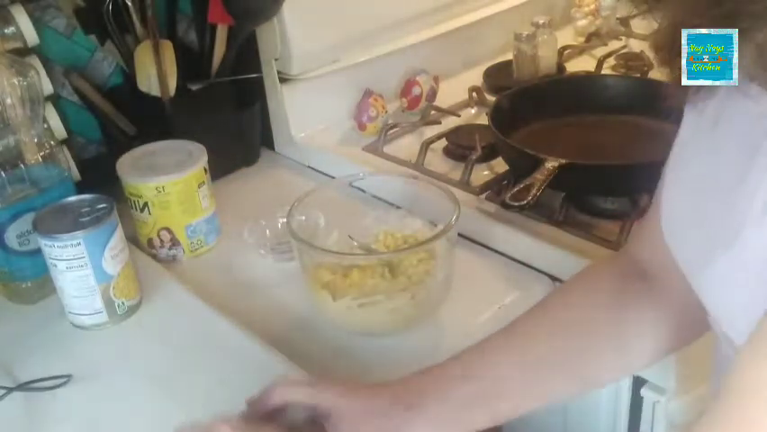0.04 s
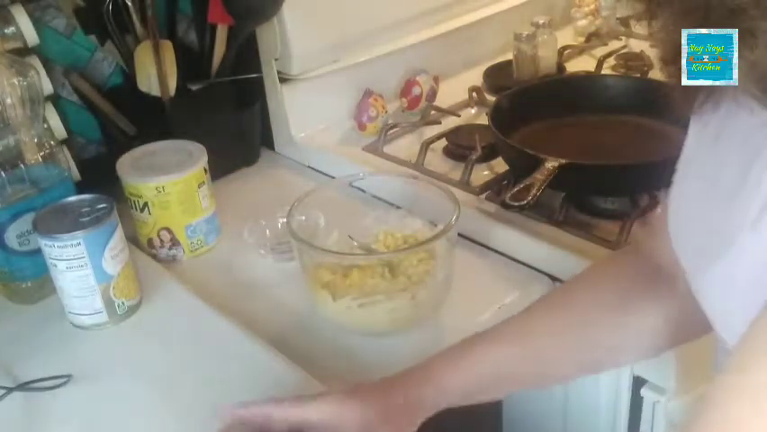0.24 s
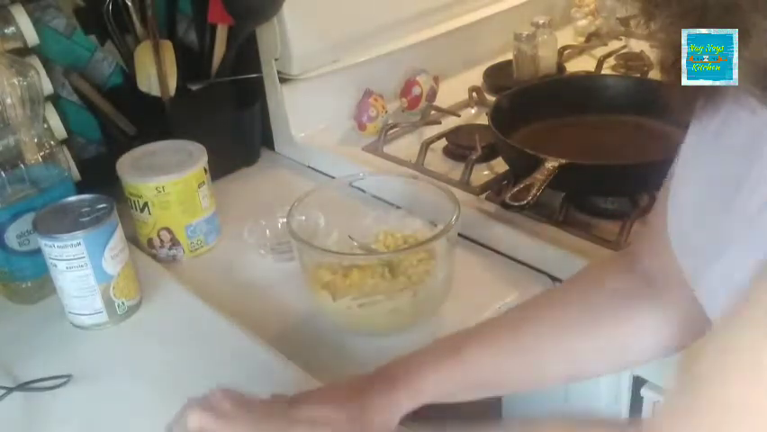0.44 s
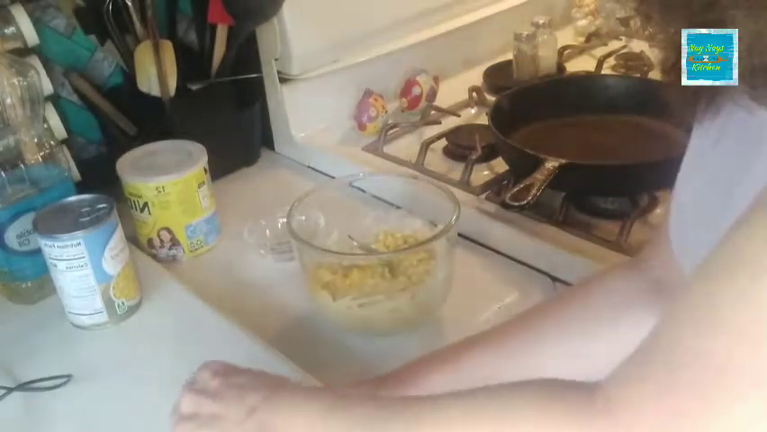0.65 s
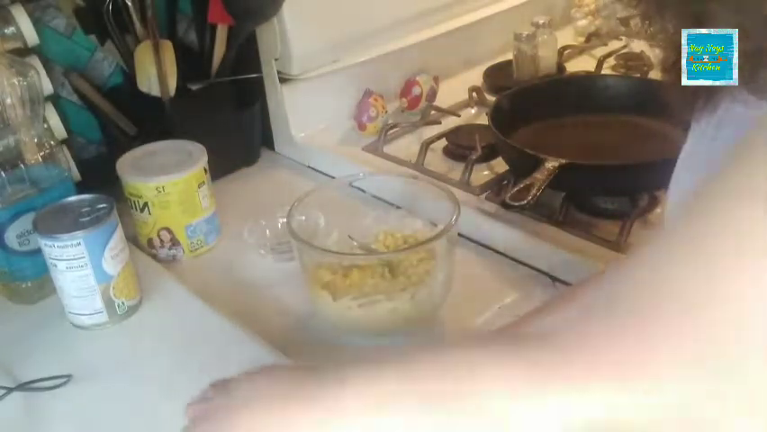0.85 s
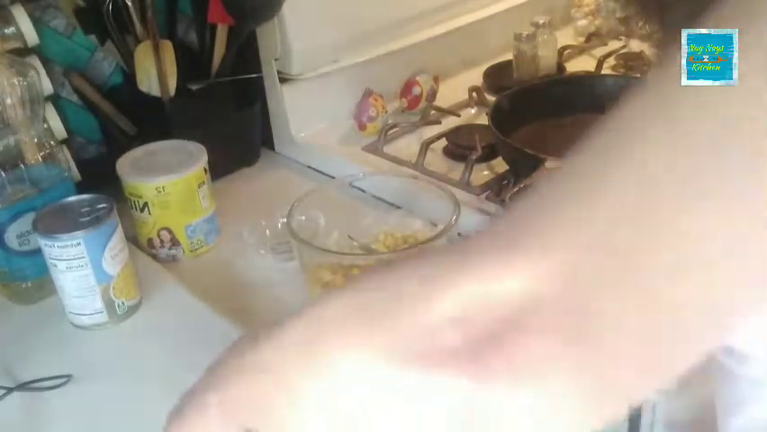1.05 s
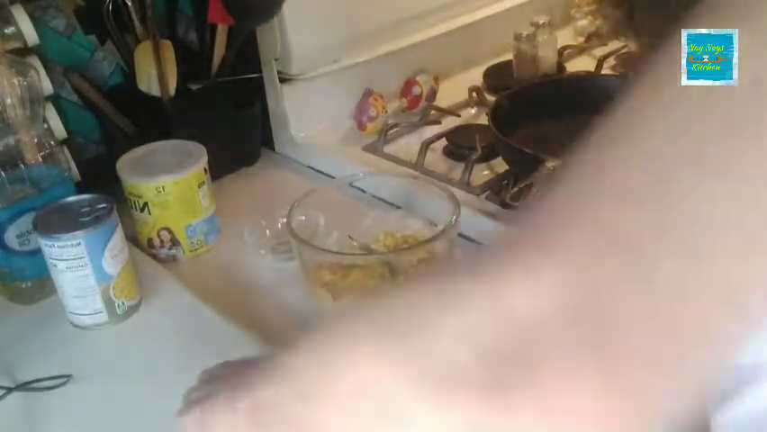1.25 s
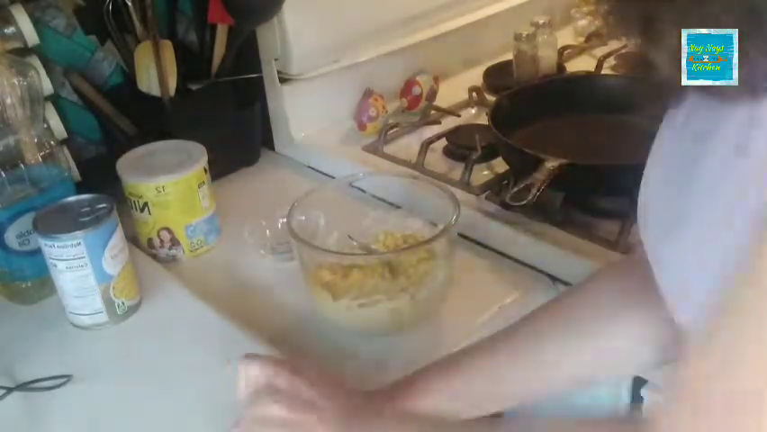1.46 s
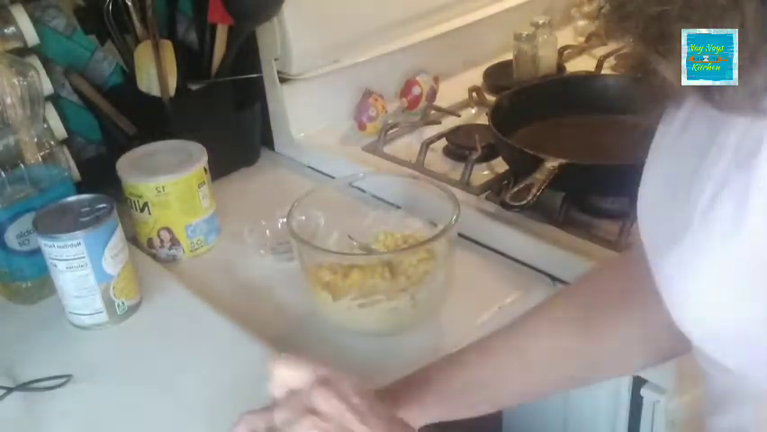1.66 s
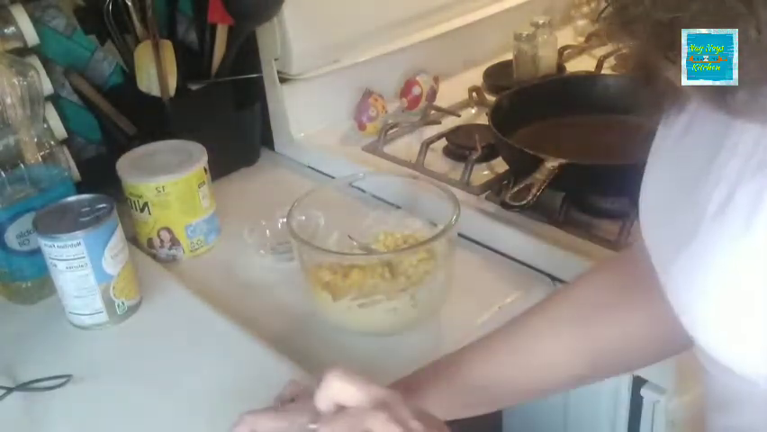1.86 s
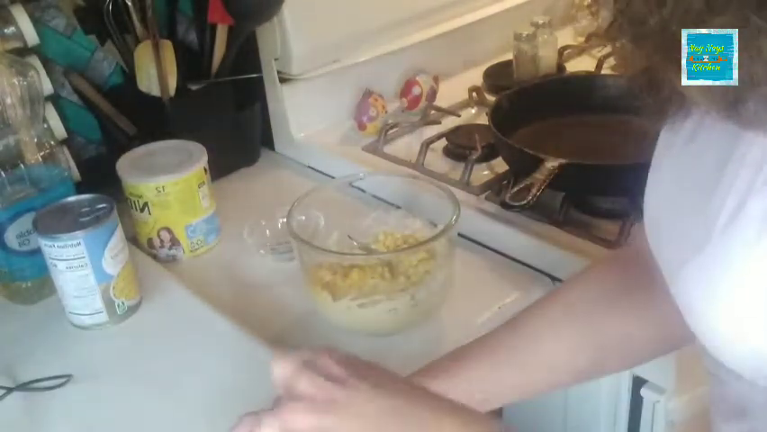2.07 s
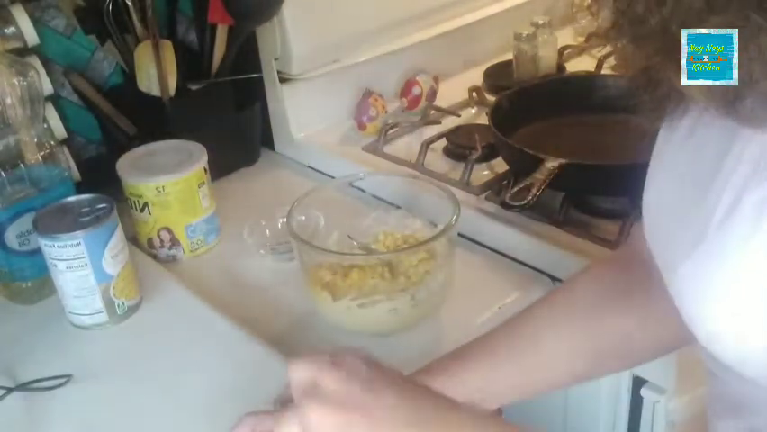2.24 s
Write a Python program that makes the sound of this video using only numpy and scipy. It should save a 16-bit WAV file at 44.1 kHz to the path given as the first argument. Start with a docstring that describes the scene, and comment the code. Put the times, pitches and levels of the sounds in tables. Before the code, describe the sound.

A small metal can is knocked hard on a kitchen counter, clattering a few times, then twisted and scraped under a hand with gritty rasps and short rings; a low appliance hum continues, close stereo microphone.

```python
"""A kitchen counter, with a two-port microphone that hears near echoes and the longer tail of the walls.
An appliance hums throughout over soft room noise and the faint rustle of hands.
From 0.13 s a small metal can is knocked: damped modes, clatter, crack and thud; the loudest blow clips.
From 1.16 to 1.86 s it is twisted and scraped under a hand: gritty slips rasp and single rings sing out.
From 2.16 s the background alone eases off."""
import sys
import numpy as np
from scipy import signal
from scipy.fft import rfft, irfft, next_fast_len
from scipy.io import wavfile

SR = 44100
rng = np.random.default_rng(int(sys.argv[2]) if len(sys.argv) > 2 else 0)


def file_out(sig):
    """Save sig as 16-bit WAV at sys.argv[1]."""
    # one column per channel
    cols = np.atleast_2d(sig).T
    # limit, then scale
    lim = np.clip(cols, -1, 1)
    pcm = np.round(lim * 32767).astype(np.int16)
    wavfile.write(sys.argv[1], SR, pcm)


def volts_from_db(level):
    """Convert decibel levels to linear amplitude ratios."""
    exponent = np.asarray(level, float) / 20
    return 10 ** exponent


N = 101429  # samples, 2.3 s


def evened(x):
    """Scales to rms 1."""
    return x / np.sqrt(np.mean(x ** 2) + 1e-20)


def read(points, hz):
    """Reads a table on a log-frequency axis."""
    f, value = np.transpose(points)
    return np.interp(np.log(hz + 1), np.log(f + 1), value)


def colour(x, points, scale=1):
    """Filters by a spectrum in dB, multiplied by scale."""
    size = next_fast_len(x.shape[-1] + 4096)
    gain = volts_from_db(scale * read(points, np.fft.rfftfreq(size, 1 / SR)))
    return irfft(rfft(x, size) * gain, size)[..., :x.shape[-1]]


def add(mix, s, sound):
    """Mixes a sound in at time s."""
    part = mix[round(s * SR):][:len(sound)]
    part += sound[:len(part)]


def resonate(x, hz, width_hz):
    """A resonance of gain 1 at hz: shift down to zero, smooth with one pole, shift back up."""
    turn = np.exp(2j * np.pi * np.cumsum(hz * np.ones(len(x))) / SR)
    r = np.exp(-np.pi * width_hz / SR)
    return 2 * (turn * signal.lfilter([1 - r], [1, -r], x / turn)).real


# modes of can and counter: f/Hz, level/dB, t60/s before the hand's damping
CAN_MODES = [(342, -7.5, 0.14), (436, 0.5, 0.085), (511, 5.5, 0.07), (641.5, -9, 0.12), (732, 0.5, 0.11),
             (809.5, 3.5, 0.13), (1075, 3, 0.074), (1232, 12.5, 0.042), (1410, 6, 0.042), (1713, -2, 0.14),
             (2120, 10.5, 0.033), (2342, -28, 0.05), (2800, -22, .1), (3500, -39, 0.063),
             (4100, -15, 0.027)]
# low thud of the counter: f/Hz, level/dB, decay to 1/e/s
COUNTER_THUD = [(108, -4.5, .012), (180.6, 4.5, 0.0074)]
# spectrum of the crack: f/Hz, level/dB per Hz
CRACK_COLOUR = [(150, -15), (400, 2.5), (900, -4.5), (1800, 9), (2700, -2), (4000, -5.5), (6000, -18),
                (8000, -14), (11000, -29), (16500, -25)]


def blow(level_db, centre_hz, rise_s, thud_db, crack_db, low_db):
    """Modes damped by the hand build up under a dense clatter; a crack and a low thud go with them."""
    ring_octaves, damping = 3.2, 0.87  # spread of the ring about its centre; factor on each t60
    crack_s, clatter_s, clatter_db = 0.0066, 0.01, -1
    tick, tick_s = 0.54, 0.00082  # sharp start of the crack
    t = np.arange(0, .3, 1 / SR)
    hz, db, t60 = np.transpose(CAN_MODES)[:, :, None]
    tilt_db = -6 * (np.log2(hz / centre_hz) / ring_octaves) ** 2 + low_db * (hz < 680)
    decay = volts_from_db(db + tilt_db - 60 * t / (damping * t60))
    ring = (decay * np.sin(2 * np.pi * (hz * t + rng.random(hz.shape)))).sum(0)
    crack_noise, clatter_noise = rng.standard_normal((2, len(t)))
    swell = 1 - np.exp(-t / rise_s)
    crack_fall = np.exp(-t / crack_s) + tick * np.exp(-t / tick_s)
    crack = evened(colour(crack_noise, CRACK_COLOUR)) * crack_fall * np.minimum(t * 4000, 1)
    clatter = evened(resonate(clatter_noise, centre_hz, 1000)) * np.exp(-t / clatter_s)
    thud = sum(volts_from_db(d) * np.sin(2 * np.pi * f * t) * np.exp(-t / fall_s) for f, d, fall_s in COUNTER_THUD)
    head = round(.01 * SR)  # the first 10 ms set the level of the ring
    tones = swell * (ring / np.std(ring[:head]) + volts_from_db(thud_db) * thud)
    noise = volts_from_db(clatter_db) * swell * clatter + volts_from_db(crack_db) * crack
    return volts_from_db(level_db) * tones, volts_from_db(level_db) * noise


# blows on the can: t/s, level/dB, centre of the ring f/Hz, build-up/s,
# then levels/dB of the thud, crack and low modes (below 680 Hz)
CAN_BLOWS = [(.128, -46, 790, 0.0087, -12, -1, -13), (0.2401, -11, 950, 0.0013, -11.5, 1, 0.5),
             (0.3457, -19, 1570, 0.0019, -0.5, 5.5, 4), (.452, -43, 830, 0.0036, -23, -17, 16),
             (0.572, -41, 850, 0.0048, 0, -11, -6), (0.8049, -18.5, 1570, 0.0028, -0.5, 2.5, 1),
             (1.136, -45, 1000, .002, -13, -18, -3), (1.1626, -30, 1080, 0.0028, 1, -8, -5)]


def knocks():
    """Each blow finds its own echoes; tones get weaker close echoes and more wall tail than noise."""
    out = np.zeros((2, N))
    for s, *row in CAN_BLOWS:
        tones, noise = blow(*row)
        can = np.zeros((2, N))
        add(can[0], s, tones)
        add(can[1], s, noise)
        out += kitchen(can[0], near_db=-9, far_db=-5.5) + kitchen(can[1], near_db=3, far_db=-12.5)
    return out


def grit(count):
    """Dense tiny slips of uneven size."""
    per_s, spread_db = 6000, 3.5
    size = volts_from_db(spread_db * np.minimum(rng.exponential(1, count), 3))
    return size * rng.choice([-1., 1.], count) * (rng.random(count) < per_s / SR)


# spectrum of the rasp: f/Hz, level/dB per Hz
RASP_COLOUR = [(150, -5.5), (400, -9.5), (900, -12), (1800, -4), (2700, -5), (4000, -6), (6000, -14.5),
               (8000, -16.5), (11000, -17), (16500, -29)]


def scrape(stroke):
    """Gritty slips rasp under the changing pressure, with a flutter of uneven stick and slip."""
    split_hz, flutter_db, flutter_hz = 3500, 1.5, 44.5  # treble split; flutter rms and top rate
    t = np.arange(N) / SR
    s, *cols = np.transpose(stroke)
    level_db, treble_db = (np.interp(t, s, c) for c in cols)
    rasp = evened(colour(grit(N), RASP_COLOUR))
    body = signal.sosfiltfilt(signal.butter(2, split_hz, fs=SR, output="sos"), rasp)
    flutter = signal.sosfilt(signal.butter(2, flutter_hz, fs=SR, output="sos"), rng.standard_normal(N))
    pressure = volts_from_db(level_db + flutter_db * evened(flutter)) * ((t > s[0]) & (t <= s[-1]))
    return pressure * (body + volts_from_db(treble_db) * (rasp - body))


# one table for each stroke of the can under the hand: t/s, pressure level/dB, treble level/dB
STROKES = [
    [(1.163, -29.5, 4.7), (1.181, -31.5, 4), (1.197, -27.5, 1.6), (1.3, -50, -4)],
    [(1.3, -43, -6.3), (1.388, -29.5, 6.4), (1.438, -37.5, -5), (1.494, -34.5, -1), (1.535, -74, 7)],
    [(1.535, -58, 12.5), (1.569, -44.5, 1), (1.595, -38.5, 3.5), (1.603, -39.5, -2), (1.657, -35, -2.2),
     (1.695, -40.5, -6), (1.711, -34, 1.5), (1.783, -45, 4.3), (1.86, -64, -16)],
]


def scraping():
    """The can moves about, so each stroke finds its own echoes."""
    return sum(kitchen(scrape(stroke), near_db=-0.5, far_db=-12.5) for stroke in STROKES)


def sing(length_s, hz, db):
    """Grit feeds one ring, joined by a steady tone; the two swell and fade."""
    width_hz, steady, rise = 34, 1.11, 0.41  # steady: tone against grit; rise: below 1 the swell peaks early
    u = np.arange(0, 1, 1 / (length_s * SR))
    ring = evened(resonate(grit(count=6000), hz, width_hz)[-len(u):])
    ring = ring + steady * np.sin(2 * np.pi * (hz * u * length_s + rng.random()))
    return volts_from_db(db) * evened(ring) * np.abs(np.sin(np.pi * u ** rise)) ** 1.1


# moments when a touch or the rubbing makes one ring of the can sing out:
# t/s, length/s, f/Hz, level/dB (rms before the swell and fade)
SINGING_RINGS = [(0.125, 0.022, 807, -46.5), (0.128, .012, 1600, -51.5), (.452, .02, 860, -42),
                 (0.57, 0.033, 825, -47.5), (1.162, 0.015, 1080, -26.5), (1.163, 0.019, 4285, -24),
                 (1.186, .04, 1075, -25.5), (1.183, 0.065, 2653, -29), (1.197, 0.021, 2760, -26.5),
                 (1.184, 0.021, 1870, -30), (1.191, 0.045, 732, -39), (1.217, .07, 1332, -37.5),
                 (1.257, .04, 2800, -42), (1.351, .04, 1898, -31), (1.356, 0.025, 3113, -26.5),
                 (1.379, .035, 1637, -30.5), (1.38, 0.043, 2754, -26.5), (1.385, 0.053, 1102, -37.5),
                 (1.346, 0.039, 4290, -31), (1.446, 0.029, 1756, -35.5), (1.474, 0.045, 1650, -33.5),
                 (1.58, .04, 1760, -41.5), (1.631, 0.041, 2560, -44), (1.637, 0.062, 1890, -39),
                 (1.642, .03, 3247, -36), (1.691, 0.057, 1982, -35.5), (1.701, 0.073, 505, -42),
                 (1.709, 0.072, 3680, -38.5), (1.704, 0.036, 2275, -41)]


def singing():
    """All the singing rings share one set of echoes."""
    rings = np.zeros(N)
    for s, *row in SINGING_RINGS:
        add(rings, s, sing(*row))
    return kitchen(rings, near_db=-9, far_db=-5.5)


# likeness of the two ports: f/Hz, correlation
PORT_LIKENESS = [(30, 0.78), (150, 0.92), (400, 0.64), (1000, 0.17), (2000, 0.067), (16000, 0.017)]


def pair(count):
    """Two noises, alike in the bass and nearly unrelated in the treble."""
    a, b = rfft(rng.standard_normal((2, count)))
    same = np.clip(read(PORT_LIKENESS, np.fft.rfftfreq(count, 1 / SR)), -1, 1)
    return irfft(np.array([a, same * a + np.sqrt(1 - same ** 2) * b]), count)


# fall of the wall echoes: f/Hz, t60/s
WALL_TAIL = [(150, 0.26), (500, 0.22), (1500, 0.25), (4000, .3), (12000, 0.21)]


def kitchen(x, near_db, far_db):
    """Direct sound, close echoes from the counter and a longer tail from the walls."""
    near_t60_s, left_lag_s = 0.04, .00015
    low_cut_hz = 74  # on all sounds sent into the kitchen
    t = np.arange(SR // 2) / SR
    near = pair(len(t)) * volts_from_db(-60 * t / near_t60_s) * (t > .0004)
    hz, at, z = signal.stft(pair(len(t)), SR, nperseg=256)
    fall = volts_from_db(-60 * at / read(WALL_TAIL, hz)[:, None])
    far = signal.istft(z * fall, SR, nperseg=256)[1][:, :len(t)]
    far = far * np.clip(t / 0.03, 0, 1)
    taps = volts_from_db(near_db) * near / np.linalg.norm(near[0]) + volts_from_db(far_db) * far / np.linalg.norm(far[0])
    taps[0, round(left_lag_s * SR)] += 1  # direct sound, left
    taps[1, 0] += 1  # direct sound, right
    x = signal.sosfilt(signal.butter(2, low_cut_hz, "high", fs=SR, output="sos"), x)
    return signal.fftconvolve(x[None], taps, axes=1)[:, :N]


# spectrum of the room noise: f/Hz, level/dB per Hz
ROOM_COLOUR = [(12, -32), (22, 7), (68, -2), (130, -1.5), (190, -8.5), (400, -12), (640, -28), (1000, -24),
               (2750, -21), (6000, -45), (11000, -52), (16500, -40)]
# rustle of the hands: t/s, level/dB
HAND_RUSTLE = [(0.0, -48.5), (0.4, -49), (0.7, -50.5), (1.22, -49.5), (1.34, -50.5), (1.61, -48),
               (1.79, -49.5), (2.05, -51), (2.3, -48)]
# spectrum of the rustle: f/Hz, level/dB per Hz
HAND_COLOUR = [(200, -30), (400, -8), (1000, -9.5), (3000, -19.5), (7300, -25.5), (16500, -45.5)]
# lines of the appliance hum: f/Hz, level/dB rms, width of the fuzz/Hz
APPLIANCE_HUM = [(156, -43.5, 9), (427, -60, 8.6), (1170, -62, 3.2)]


def background():
    """Room noise, the faint rustle of hands, and the slightly fuzzy lines of the hum."""
    room_db, ease_s, ease_db_per_s = -44, 2.16, -28  # it eases off at the end
    t = np.arange(N) / SR
    out = volts_from_db(room_db) * evened(colour(pair(N), ROOM_COLOUR))
    rustle_db = np.interp(t, *np.transpose(HAND_RUSTLE))
    out += volts_from_db(rustle_db) * evened(colour(pair(N), HAND_COLOUR))
    for hz, db, width_hz in APPLIANCE_HUM:
        fuzz = evened(resonate(rng.standard_normal(N), hz, width_hz))
        line = np.sin(2 * np.pi * (hz * t + rng.random()))
        out += volts_from_db(db) * evened(line + 0.1 * fuzz)
    return out * volts_from_db(ease_db_per_s * np.maximum(t - ease_s, 0))


def scene():
    """The can on the counter, over the hum and the room."""
    return knocks() + scraping() + singing() + background()


def top_cut(x):
    """Nothing passes above the cut-off."""
    return signal.sosfilt(signal.butter(12, 16170, fs=SR, output="sos"), x)


# colour of the microphone: f/Hz, level/dB
MIC_COLOUR = [(30, 2), (200, 1.5), (270, -1.5), (350, 5), (5500, -3), (7500, -0.5), (8900, -7.5),
              (10400, -0.5), (12000, -13), (15500, -23), (16500, -22)]
# balance of its two ports: f/Hz, left minus right level/dB
PORT_BALANCE = [(60, -0.5), (130, -2.5), (290, -2.5), (640, 0.5), (1410, 2), (3100, -0.5), (6820, 6.5),
                (15000, -18)]


def record(dry):
    """The microphone colours the sound, its ports share the balance, and both clip at full scale."""
    dry = colour(dry, MIC_COLOUR)
    left = colour(dry[0], PORT_BALANCE, 1 / 2)
    right = colour(dry[1], PORT_BALANCE, -1 / 2)
    return top_cut(np.clip(np.array([left, right]), -1, 1))


dry = scene()
out = record(dry)
file_out(out)
```